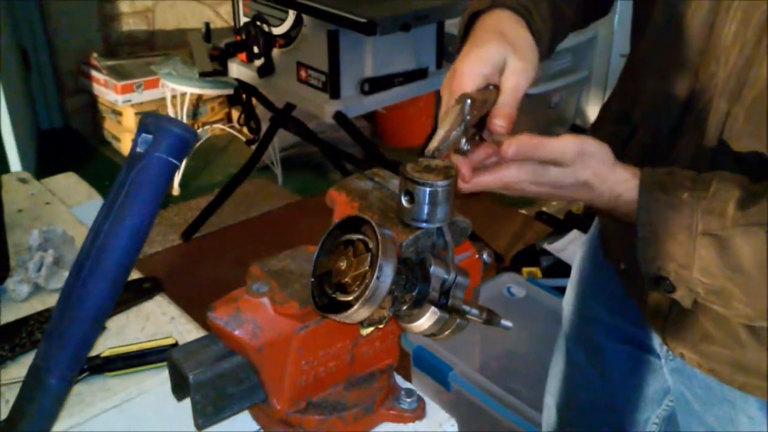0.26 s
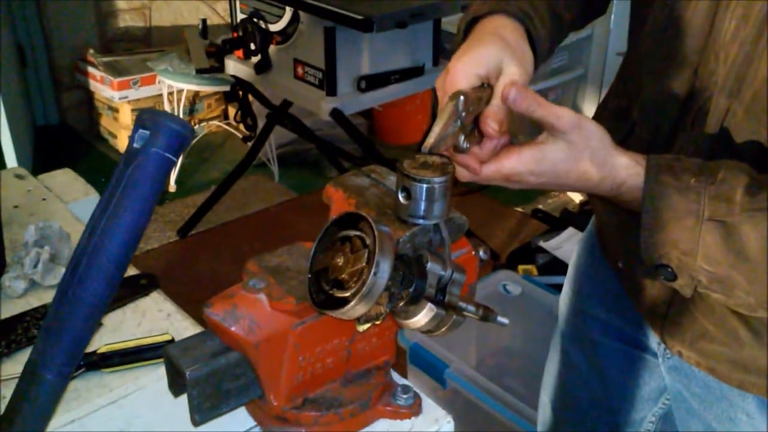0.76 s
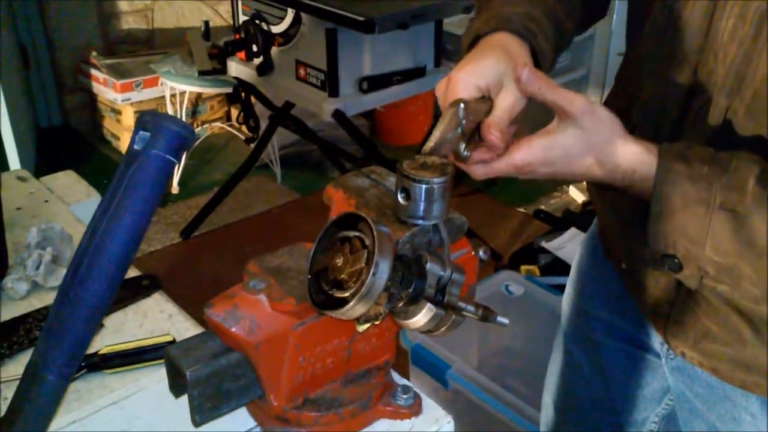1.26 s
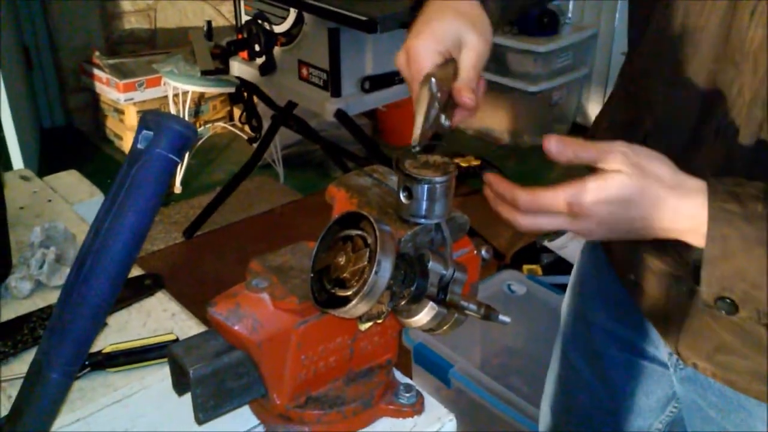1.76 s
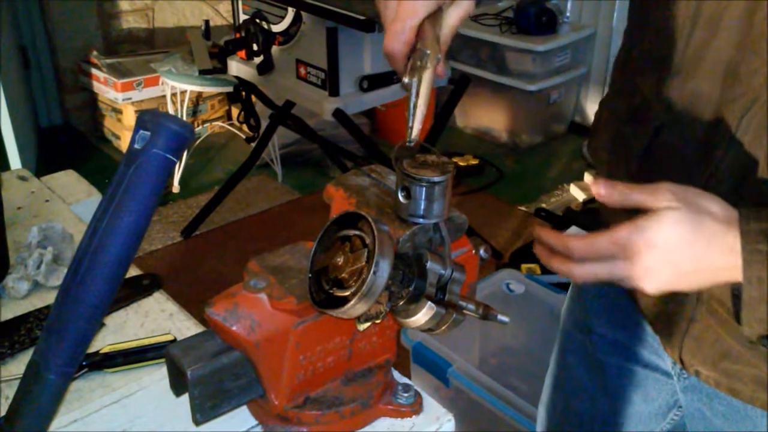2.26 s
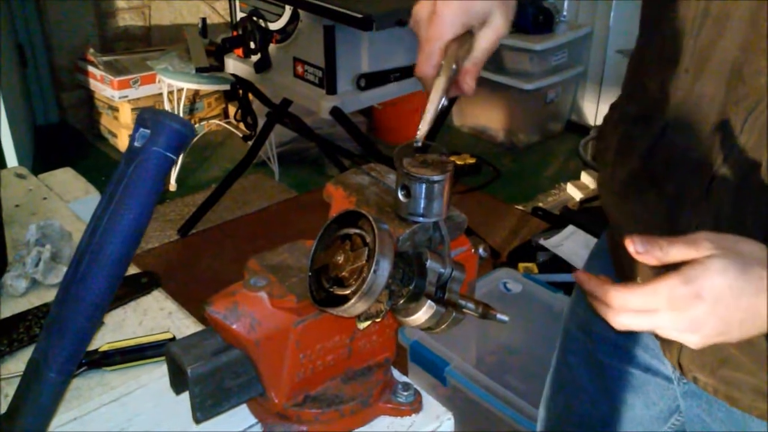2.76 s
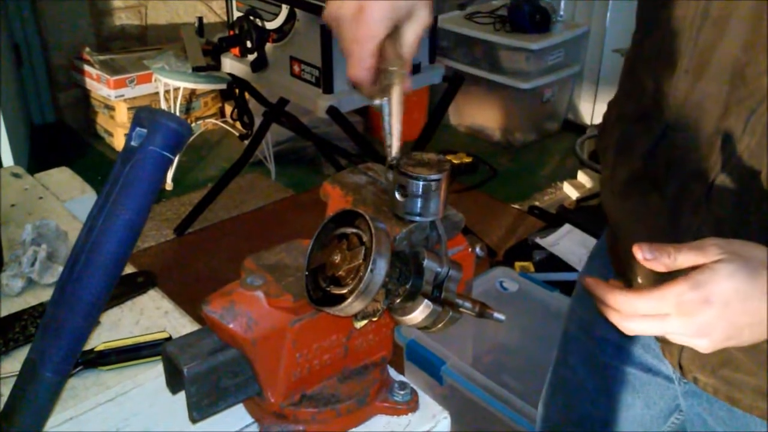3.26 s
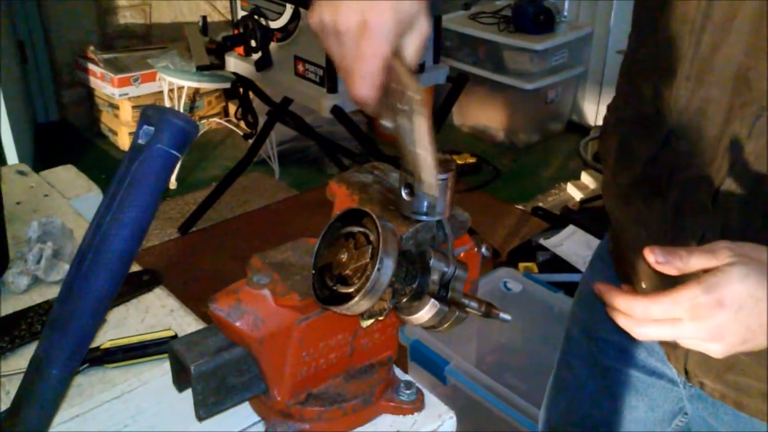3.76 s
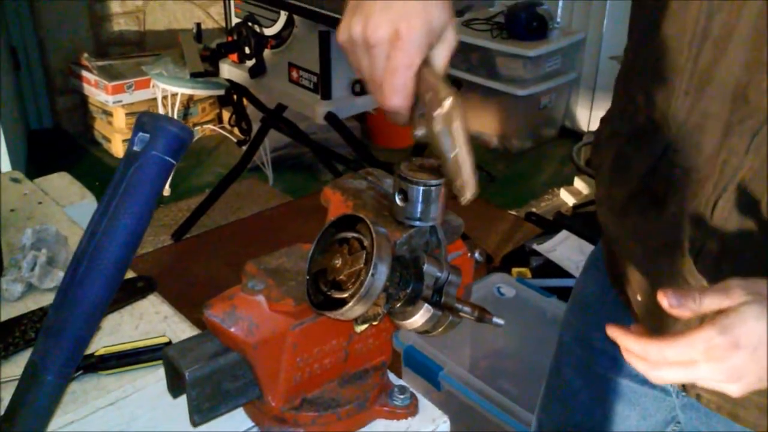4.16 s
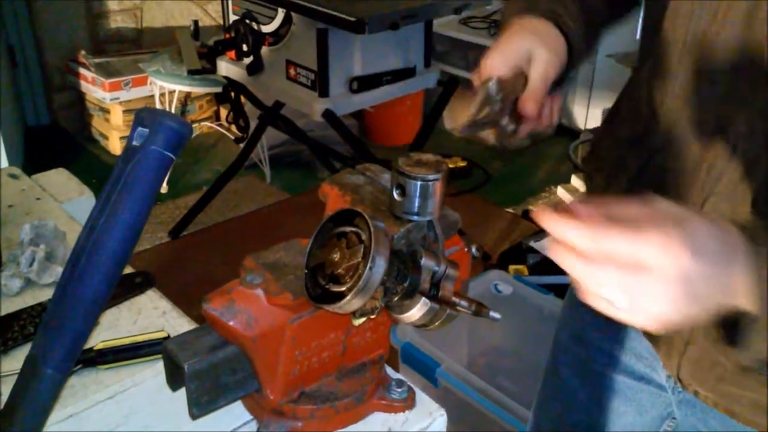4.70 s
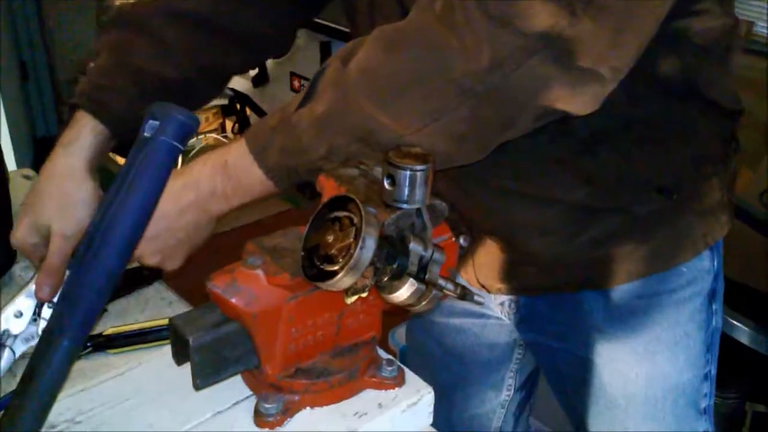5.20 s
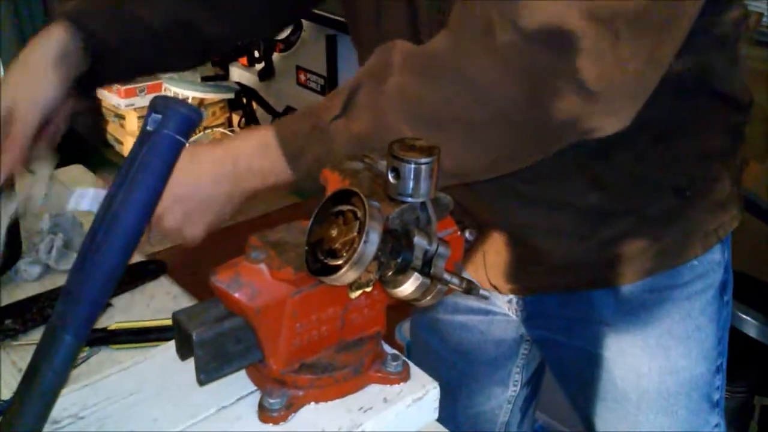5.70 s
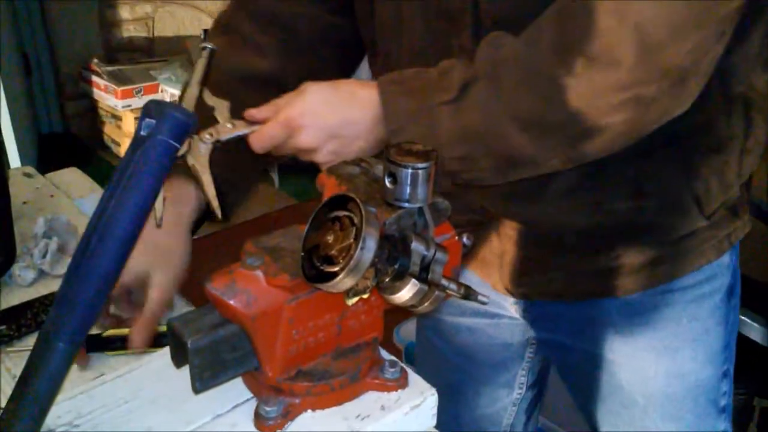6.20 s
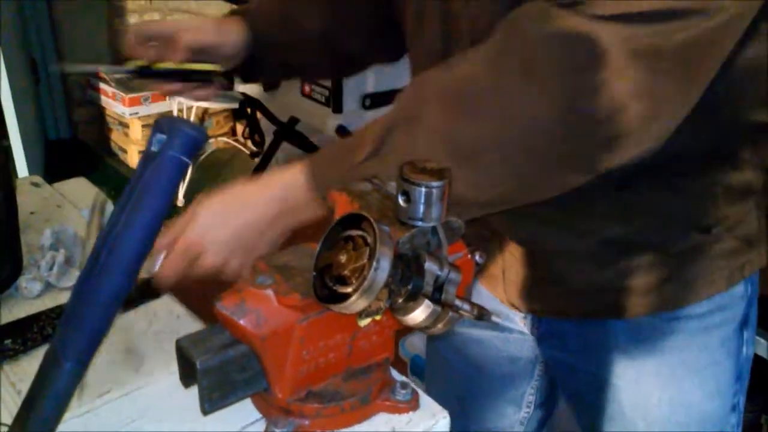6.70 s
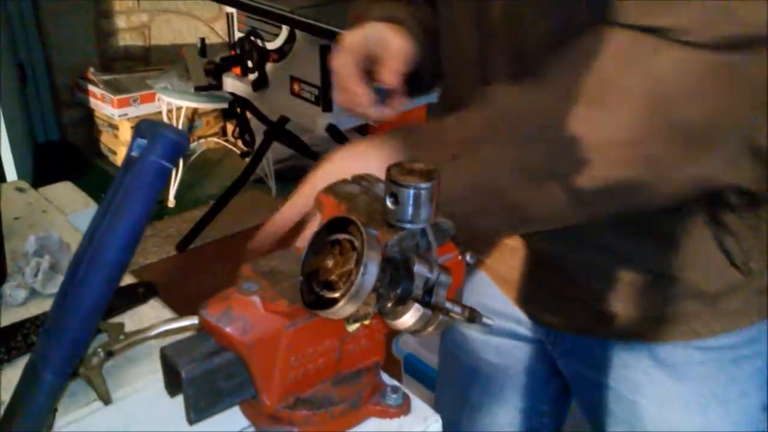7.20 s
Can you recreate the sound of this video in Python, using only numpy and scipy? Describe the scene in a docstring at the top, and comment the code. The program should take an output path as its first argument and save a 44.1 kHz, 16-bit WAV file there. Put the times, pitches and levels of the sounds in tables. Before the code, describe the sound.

Close-up workbench sounds: a quick rattling cluster of steel on metal, a sharp loud blow that briefly overloads the microphone, and several lighter clinks separated by quiet. Later, hand tools are put down with hollow wooden knocks and bright metallic ringing, first in one clatter, then in a heavier one. Short dense room echoes follow each contact; low murmur and thin hiss swell after blows and sink in pauses.

```python
"""A low murmur and a thin hiss open the scene, swelling after the blows and sinking in the pauses.
Steel hand tools then tap a small engine held in a vise; each contact is a short rattle that rings the
metal and the bench, a hard-walled workshop answers with dense echoes, and loose blades ring on as tones.
From the first second short fading noise bands fill out the hits, a few of them scrapes; the hardest blow adds
a low pop and a shudder, then thin gliding tones squeak. At the end parts are set down on a wooden bench."""
import sys
import numpy as np
from scipy import signal
from scipy.fft import rfft, irfft, next_fast_len
from scipy.io import wavfile
from scipy.ndimage import uniform_filter1d

SR = 44100
rng = np.random.default_rng(int(sys.argv[2]) if len(sys.argv) > 2 else 0)


def decibels_to_gain(level_db):
    """Convert a level in decibels to a linear amplitude gain (20 dB per decade)."""
    exponent = np.asarray(level_db, float) / 20
    return 10 ** exponent


def persist_wave(psi):
    """Save psi, clipped to +-1, as 16-bit WAV."""
    counts = np.round(np.clip(psi, -1, 1) * 32767).astype(np.int16)
    wavfile.write(sys.argv[1], SR, np.atleast_2d(counts).T)


N = 328540

# background swell before the blows lift it: start_s, murmur_db, hiss_db (both rms)
BACKGROUND_SWELL = [(0, -57, -65.5), (.14, -50.5, -65.5), (.26, -46, -50), (.58, -41, -53),
                    (.83, -48.5, -56.5), (1.02, -47.5, -66), (1.47, -43.5, -48.5), (2.14, -50.5, -53.5),
                    (2.34, -40.5, -46.5), (2.59, -50.5, -53), (3.129, -50.5, -56), (3.7, -54, -58.5),
                    (4.1, -46.5, -53.5), (4.52, -46.5, -56), (4.85, -58, -55), (5.27, -68, -62),
                    (5.93, -58, -47.5), (6.249, -64.5, -64.5), (6.64, -79, -73), (6.87, -73.5, -62.5),
                    (7.45, -44, -32.5)]
# colours of the three background layers, relative levels: pitch_hz, level_db per Hz
MURMUR_COLOUR = [(15, -35.5), (25, -15.5), (54, -2), (189, 1), (233, -3), (330, -3), (465, -11),
                 (609, -23.5), (900, -22), (1170, -49), (1980, -120)]
MIDDLE_COLOUR = [(300, -14), (600, -0.5), (1200, -3), (2500, -9.5), (5000, -16), (8000, -26.5)]
HISS_COLOUR = [(2350, -45.5), (4000, -19), (4410, -18.5), (5670, -15), (6630, -15), (12500, 0.5),
               (15200, -3.5), (16000, -4.5)]
# how murmur, middle and hiss linger after a blow, one row each: level_db re the blow, fade_db_per_s
LINGER_FADES = [(-23.5, 62), (-34, 89.5), (-32, 61)]
# knocks through vise and bench: start_s, level_db (peak of the part), part_hz, bench_db re part, rattle_t60_s
KNOCK_HITS = [(0.281, -54, 452, -1, .043), (.351, -30.5, 992, -9.5, 0.2), (.399, -30.5, 1000, -9, 0.02152),
              (1.025, -31.5, 1832, -4, 0.22), (1.16, -22.5, 454, -15.5, 0.066),
              (1.641, -37, 1810, -27, 0.05), (1.721, -32, 949.9, -4, .04), (1.756, -45.5, 482, 9, 0.05757),
              (2.143, -27.5, 1605, -9, 0.1), (3.716, -49, 497, -8, .05), (3.753, -42, 920, -4, 0.43),
              (3.814, -16, 999.9, -12, 0.19), (3.818, -22, 498, -12.5, 0.11),
              (4.013, -42.5, 1110, 4, 0.057), (4.302, -44, 452, 0, 0.042), (4.912, -56.5, 667, -3.5, .05),
              (5.305, -22, 560, 5.5, 0.13), (5.323, -27, 622, 6, .05), (5.351, -10.5, 897, -4, .12),
              (5.364, -10.5, 806.5, -5, .036), (5.385, -13, 621.4, -21, .1),
              (5.419, -20, 695.6, -6.5, .034), (6.079, -58.5, 818, -13, .06),
              (6.826, -32, 493, -0.6, 0.12388), (6.908, -6.5, 830, 1.3, 0.11),
              (6.934, -5.5, 1420, -21.5, .017), (6.952, -6.5, 1378, -3.5, 0.091),
              (7.019, -13.5, 1413, -18, 0.0241), (7.182, -30.5, 769.1, -1, 0.06876),
              (7.359, -32.5, 1180, -11, .015)]
# resonances of the bench boards, relative levels: pitch_hz, width_hz, level_db
BENCH_MODES = [(204, 34, -1.5), (256.01, 36, -1.5), (299, 49, 1), (350, 59, -4.5), (407.69, 74, -5.5),
               (520, 82, -6), (620, 100, -4), (674, 87, -5)]
# resonances of the metal casting, relative levels: pitch_hz, width_hz, level_db
CASTING_MODES = [(920, 63, 2.5), (1014, 54, -4), (1195, 30, -19.5), (1460.9, 59, 1.5), (1560.6, 160, -4.5),
                 (2013, 86, -4), (2406, 30, -24.5), (3230, 200, -18.5)]
# metal on metal: start_s, level_db (peak of the tick), tick_hz, clink_hz, clink_db re tick, rattle_t60_s
CLINK_HITS = [(0.2838, -31, 12500, 6200, -5, 0.066), (0.3531, -4.5, 13200, 4560, -10.5, .1),
              (0.3636, -9.5, 14000, 4800, -17, .1), (0.3829, -10, 15180, 7470, -17.5, 0.11),
              (.3988, -10, 15100, 5950, -6, 0.036), (.4083, -14, 12970, 7391, -24.5, .06),
              (1.0243, -10, 9880, 5890, -11, 0.078), (1.0352, -15, 9000, 6530, -30.5, 0.049),
              (1.1584, 2.5, 13550, 6410, -5.5, 0.08), (1.641, -28, 11700, 6000, -5.5, 0.056),
              (1.7574, -27.5, 12100, 4427, -12.5, .04), (2.142, -6, 12270, 6030, -15.5, 0.11),
              (2.1531, -10, 12900, 4503, -11.5, .056), (3.7559, -18, 11500, 5800, -11.5, 0.073),
              (3.7678, -19.5, 11100, 6060, -14, 0.085), (3.7995, -18, 12900, 5800, -24.5, 0.036),
              (3.8139, -5, 13100, 5945, -13.5, .05), (4.0146, -23.5, 13100, 5860, -15, 0.071),
              (4.14, -40, 14300, 7690, -17.5, 0.0943), (4.3022, -13.5, 13420, 4980, -26, 0.016),
              (4.308, -22, 13120, 4980, -28, 0.08), (4.314, -20.5, 13300, 7290, -28.5, .1),
              (4.9118, -45, 11550, 5970, -15.5, .03), (5.3045, -11.5, 13140, 7507, -12, 0.12),
              (5.3121, -10.5, 13080, 6579, -12, 0.081), (5.3688, -9, 9330, 6960, -4, 0.053),
              (5.3852, -13.5, 13500, 5900, -5, .058), (5.4215, -3, 12560, 6195, -20.5, .025),
              (5.5004, -26, 12200, 5572, -10, 0.064), (5.9123, -32.5, 14480, 7410, -7, 0.13),
              (6.827, -41, 12110, 5100, 3.5, 0.18), (6.9081, -5.5, 12000, 7570, -13.5, .09),
              (6.9534, -6.5, 13000, 7200, -24.5, 0.088), (7.0565, -22.5, 14900, 6270, 3.5, 0.062),
              (7.0875, -17.5, 15100, 6550, 0, 0.024), (7.1824, -19.5, 13700, 7140, -11.5, 0.15),
              (7.357, -17.5, 13530, 6960, -3.5, 0.04), (7.366, -17, 12300, 5362, -15.5, .076)]
# decay of the workshop echoes: pitch_hz, t60_s
WORKSHOP_DECAY = [(150, 0.33), (500, 0.46), (1500, 0.45778), (4000, 0.35), (8000, 0.38), (16000, 0.24)]
# loose blades of the folding tool set ringing: start_s, then the starting level_db of each blade, highest first
JINGLE_HITS = [(0.3781, -22, -26, -22, -21), (0.3984, -19.5, -18.5, -19, -40.5),
               (5.9091, -47, -53, -39, -43.5), (6.9441, -19, -20.5, -19, -57),
               (6.9662, -31, -28.5, -23, -43), (7.0579, -34.5, -37, -28, -57), (7.0858, -25, -29, -27, -55),
               (7.1861, -29.5, -30.5, -37, -40)]
# tones of those blades before a slight random detune: pitch_hz, t60_s
BLADE_TONES = [(15070, .22), (10050, 0.053), (7470, 0.038), (5120, 0.0266)]
# short fading noise bands that fill out the hits, a few of them scrapes:
# start_s, length_s, level_db (rms before the fades), pitch_hz, width_hz
NOISE_BANDS = [(1.014, 0.083, -27.5, 10700, 6053), (1.029, .092, -28.5, 8170, 600),
               (1.149, 0.018, -22, 11690, 5016), (1.72, 0.12, -41.5, 984.3, 120),
               (1.714, 0.16436, -42.5, 452.8, 100), (2.146, 0.17, -43, 1920, 350),
               (2.144, .12, -47.5, 899, 200), (3.819, 0.19, -37, 4577, 1800),
               (7.357, 0.11, -41.5, 3000, 3500), (4.306, .063, -58, 5080, 200),
               (4.442, 0.1962, -54, 730, 400), (5.299, 0.29, -34, 4430, 2500),
               (5.37, 0.077, -24.5, 9000, 1200), (5.372, 0.055, -22.5, 201, 70),
               (6.249, .11, -62.5, 783.6, 395), (6.824, .14, -50, 10600, 5030), (6.829, .49, -39, 490, 297),
               (6.832, .15, -47.5, 2660, 302), (6.907, 0.18, -30.5, 5700, 2545),
               (6.912, .2, -22, 1435, 78.9), (7.137, 0.067, -30.5, 520, 157)]
# low pop as the hardest blow overloads the microphone: start_s, level_db (peak), rise_s
POP_SHAPE = (1.159, -4, 0.00067)
# the engine shuddering after the hardest blow: start_s, level_db (rms before the fade), length_s, fade exponent
SHUDDER_SHAPE = (1.16, -14, 0.175, 1.8)
# resonances of the engine's loose parts, relative levels: pitch_hz, width_hz, level_db
ENGINE_MODES = [(1580, 900, -18.5), (2712, 1100, -17), (4200, 1800, -18.5), (5900, 610, -7.5),
                (6690, 800, -1.5), (10023, 2000, -6.5), (13300, 2500, -2.5), (14900, 2100, -2)]
# thin squeaks and tinks before they waver: start_s, length_s, level_db (peak), start_hz, end_hz
SQUEAK_TONES = [(1.64, .03, -46, 1800, 1814), (1.682, 0.039, -46.5, 2220, 1950),
                (1.937, 0.1385, -69.5, 1832, 1876), (5.054, 0.0234, -69, 2580, 2600),
                (5.599, 0.17588, -59, 1560, 1549), (6.258, 0.02757, -70, 2620, 2600)]


def rms_one(x):
    """Scale to rms 1."""
    return x / np.sqrt(np.mean(x ** 2) + 1e-20)


def peak_one(x):
    """Scale so that the loudest millisecond has the power of a unit sine."""
    return x / np.sqrt(2 * uniform_filter1d(x * x, size=44).max() + 1e-20)


def at_hz(points, hz):
    """Read a table on a log-frequency axis."""
    table_hz, values = np.transpose(points)
    return np.interp(np.log(np.maximum(hz, 1)), np.log(table_hz), values)


def butter(x, order, hz, kind):
    """Plain Butterworth filter."""
    return signal.sosfilt(signal.butter(order, hz, kind, fs=SR, output="sos"), x)


def resonance(x, hz, width_hz):
    """Two-pole band-pass of gain 1 at its centre."""
    r = np.exp(-np.pi * abs(width_hz) / SR)
    return signal.lfilter([(1 - r * r) / 2, 0, (r * r - 1) / 2], [1, -2 * r * np.cos(2 * np.pi * hz / SR), r * r], x)


def double_resonance(x, hz, width_hz):
    """The same band-pass twice, for steeper skirts."""
    return resonance(resonance(x, hz, width_hz), hz, width_hz)


def smooth(x, time_s):
    """One-pole glide with the given time constant."""
    r = np.exp(-1 / (time_s * SR))
    return signal.lfilter([1 - r], [1, -r], x)


def hold_and_fall(level_db, fall_db_per_s):
    """Follow every rise at once, then fall at a steady rate in dB."""
    ramp_db = fall_db_per_s * np.arange(N) / SR
    return np.maximum.accumulate(level_db + ramp_db, axis=-1) - ramp_db


def add(out, s, x):
    """Lay a sound into the track at s seconds."""
    i = round(s * SR)
    out[i:i + len(x)] += x[:N - i]


def coloured_noise(spectrum):
    """Steady noise with the given spectrum; rms 1."""
    size = next_fast_len(N)
    hz = np.arange(size // 2 + 1) * SR / size
    shaped = rfft(rng.standard_normal(size)) * decibels_to_gain(at_hz(spectrum, hz))
    return rms_one(irfft(shaped, size)[:N])


def lingering(blows, db, fade_db_per_s):
    """Gain that rises softly after a blow and fades at a steady rate."""
    level_db = 10 * np.log10(uniform_filter1d(blows * blows, size=441).clip(1e-12))  # over 10 ms
    return smooth(decibels_to_gain(hold_and_fall(level_db, fade_db_per_s) + db), 0.038)


def background(low_blows, high_blows):
    """Murmur, middle and hiss: coloured noises on a slow swell, lifted for a while by the blows."""
    s, *levels = np.transpose(BACKGROUND_SWELL)
    murmur_db, hiss_db = (np.interp(np.arange(N) / SR, s, db) for db in levels)
    middle_db = -36 + 0.6 * murmur_db  # the middle follows part of the murmur's swell
    layers = zip((murmur_db, middle_db, hiss_db), (low_blows, low_blows, high_blows),
                 LINGER_FADES, (MURMUR_COLOUR, MIDDLE_COLOUR, HISS_COLOUR))
    out = np.zeros(N)
    for swell_db, blows, linger, colour in layers:
        gain = np.hypot(decibels_to_gain(swell_db), lingering(blows, *linger))
        out += gain * coloured_noise(colour)
    return out


def rattle(t60, strike=3.5):
    """A sharp first contact (strike re the grains), then uneven micro-contacts that die away."""
    t = np.arange(SR // 2) / SR
    uneven_db = 3 * np.repeat(rng.standard_normal(len(t) // 50), 50)  # a new strength about every ms
    grains = rng.standard_normal(len(t)) * decibels_to_gain(uneven_db)
    grains = grains * decibels_to_gain(-60 * t / np.clip(t60, .003, 1)) + 1e-18
    return grains + strike * (t == 0)


def body(touch, modes):
    """Parallel resonances of alternating sign, each struck with a strength of its own."""
    strength = decibels_to_gain(1.5 * rng.standard_normal(len(modes)))
    ring = 0
    for k, (hz, width_hz, db) in enumerate(modes):
        ring = ring + (-1) ** k * strength[k] * decibels_to_gain(db) * resonance(touch, hz, width_hz)
    return peak_one(ring)


def knocks():
    """The struck part speaks at its own pitch; casting and bench boards join in."""
    out = np.zeros(N)
    casting_db = -12  # re the part
    for s, db, part_hz, bench_db, t60 in KNOCK_HITS:
        touch = butter(rattle(t60, strike=12.44), 4, [185, 4000], "band")
        part = peak_one(resonance(touch, part_hz, 170) + decibels_to_gain(-9) * resonance(touch, 1100, 1200))
        bench = decibels_to_gain(bench_db) * body(touch, BENCH_MODES)
        casting = decibels_to_gain(casting_db) * body(touch, CASTING_MODES)
        add(out, s, decibels_to_gain(db) * (part + bench + casting))
    return out


def clinks():
    """Bright tick, narrower steel clink and bare contact; a dry crack opening each is returned apart."""
    out, cracks = np.zeros(N), np.zeros(N)
    crack_db, crack_t60_s = 0.5, 0.013  # level re the tick
    for s, db, tick_hz, clink_hz, clink_db, t60 in CLINK_HITS:
        bare = butter(rattle(t60, strike=9), 2, 3000, "high")
        bright = butter(bare, 4, 8500, "high")
        tick = double_resonance(bare, tick_hz, 1500) + decibels_to_gain(-3) * resonance(bright, 13000, 5000)
        clink = double_resonance(bare, clink_hz, 1100) + decibels_to_gain(-7) * bare
        add(out, s, decibels_to_gain(db) * (peak_one(tick) + decibels_to_gain(clink_db) * peak_one(clink)))
        snap = rattle(crack_t60_s)
        crack_top = peak_one(double_resonance(snap, tick_hz, 2600))
        crack_low = peak_one(double_resonance(snap, clink_hz, 500))
        add(cracks, s, decibels_to_gain(db + crack_db) * (crack_top + decibels_to_gain(clink_db - 5) * crack_low))
    return out, cracks


def workshop(x):
    """Dense echoes off hard walls: half-octave bands of noise, each dying at its own rate."""
    first_echo_s, echo_gain_db = .0025, -30
    t, edges = np.arange(SR) / SR, 100 * 2 ** np.arange(0, 7.6, .5)
    echoes = 0
    for low, high in zip(edges, edges[1:]):
        band = butter(rng.standard_normal(SR), 2, [low, high], "band")
        echoes = echoes + band * decibels_to_gain(-60 * t / at_hz(WORKSHOP_DECAY, np.sqrt(low * high)))
    echoes = echoes * np.clip(t / first_echo_s - 1, 0, 1)  # silent gap, then an equally long rise
    return decibels_to_gain(echo_gain_db) * signal.fftconvolve(x, echoes)[:N]


def jingles():
    """Thin steel blades ring on as clean decaying tones."""
    out, t = np.zeros(N), np.arange(SR // 2) / SR
    for s, *levels in JINGLE_HITS:
        detunes = .001 * rng.standard_normal(len(BLADE_TONES))
        for (hz, t60), db, detune in zip(BLADE_TONES, levels, detunes):
            add(out, s, decibels_to_gain(db - 60 * t / t60) * np.sin(2 * np.pi * hz * (1 + detune) * t))
    return out


def noise_bands():
    """Noise in one resonance: a quick start, then it fades."""
    out = np.zeros(N)
    for s, length, db, hz, width_hz in NOISE_BANDS:
        share = np.arange(round(length * SR)) / (length * SR)
        noise = rng.standard_normal(SR // 2)[:len(share)]
        band = rms_one(double_resonance(noise, hz, width_hz))
        add(out, s, decibels_to_gain(db) * band * np.minimum(1, share / 0.041) * (1 - share) ** 1.1)
    return out


def overload_pop():
    """A low pop as the hardest blow overloads the microphone: one-sided, a fast rise and a slower decay."""
    out, (s, db, rise_s) = np.zeros(N), POP_SHAPE
    share = np.arange(SR // 10) / SR / rise_s
    add(out, s, decibels_to_gain(db) * share * np.exp(1 - share))
    return out


def shudder():
    """Loose parts keep chattering, each in its own resonance of the engine, until they seat."""
    out, (s, db, length, curve) = np.zeros(N), SHUDDER_SHAPE
    uneven = decibels_to_gain(2.5 * np.repeat(rng.standard_normal(SR // 100), 50))
    chatter = 0
    for hz, width_hz, level_db in ENGINE_MODES:
        grains = uneven * rng.standard_normal(SR // 2)
        chatter = chatter + decibels_to_gain(level_db) * double_resonance(grains, hz, width_hz)
    fade = np.clip(1 - np.arange(SR // 2) / (length * SR), 0, 1) ** curve
    add(out, s, decibels_to_gain(db) * rms_one(chatter) * fade)
    return out


def squeaks():
    """Near-pure gliding tones that waver a little in pitch and strength."""
    out = np.zeros(N)
    for s, length, db, start_hz, end_hz in SQUEAK_TONES:
        share = np.arange(round(length * SR)) / (length * SR)
        wander = uniform_filter1d(rng.standard_normal((2, SR // 2)), size=300) * np.sqrt(300)
        pitch, strength = wander[:, :len(share)]
        hz = (start_hz + (end_hz - start_hz) * share) * (1 + .015 * pitch)
        tone = np.sin(2 * np.pi * np.cumsum(hz) / SR)
        add(out, s, decibels_to_gain(db + 4.8 * strength) * np.sqrt(np.sin(np.pi * share)) * tone)
    return out


def scene():
    """Contacts, their echoes and the background."""
    low = knocks()
    high, cracks = clinks()
    contacts = low + high + shudder()
    struck = contacts + workshop(contacts) + cracks + jingles() + overload_pop()
    return (background(low, high) + struck + noise_bands() + squeaks())[None]


def gain_control(x):
    """Loud blows pull the gain down within milliseconds; it recovers at a steady rate."""
    limit_db, squeeze, recovery_db_per_s, attack_s = 0, 0.75, 98, .005  # squeeze: share of the excess removed
    level_db = 10 * np.log10(2 * uniform_filter1d(x * x, size=88).clip(1e-12))  # over 2 ms
    held_db = hold_and_fall(level_db, recovery_db_per_s)
    cut_db = squeeze * np.maximum(held_db - limit_db, 0)
    return x * decibels_to_gain(-smooth(cut_db, attack_s))


def band_limit(x):
    """A steep low-pass at the top of the band."""
    return signal.sosfilt(signal.butter(12, 16510, fs=SR, output="sos"), x)


def record(dry):
    """The extreme top is cut, gain control holds the blows and the loudest peaks overload softly."""
    top_cut = signal.sosfilt(signal.ellip(8, .5, 45, 15900, fs=SR, output="sos"), dry)
    overloaded = 1.183 * np.tanh(gain_control(top_cut) / 1.124)
    return band_limit(np.clip(overloaded, -1, 1))


dry = scene()
out = record(dry)
persist_wave(out)
```